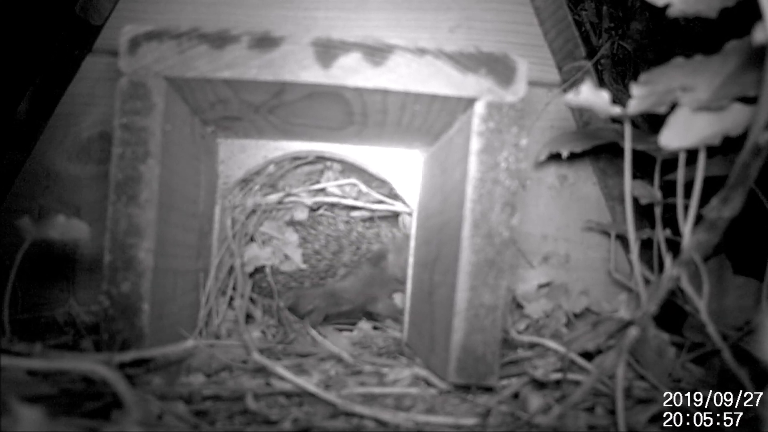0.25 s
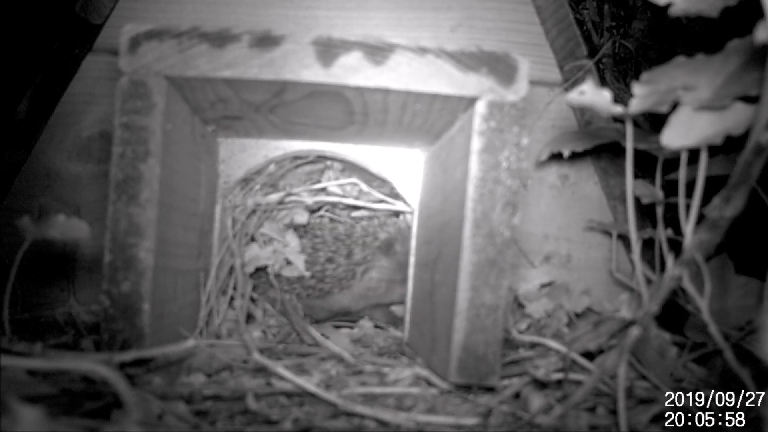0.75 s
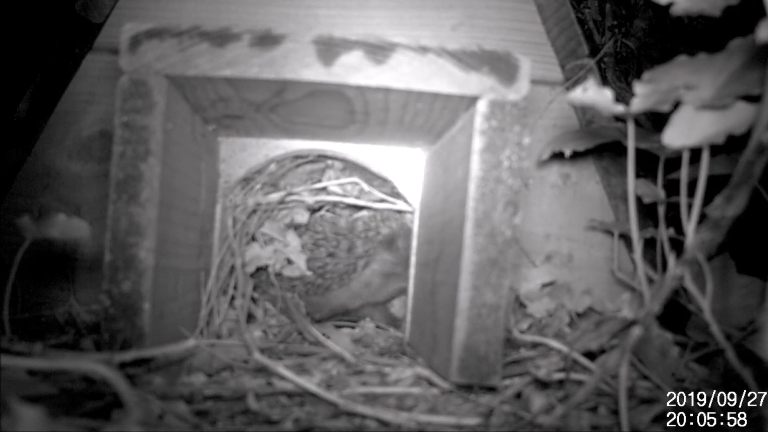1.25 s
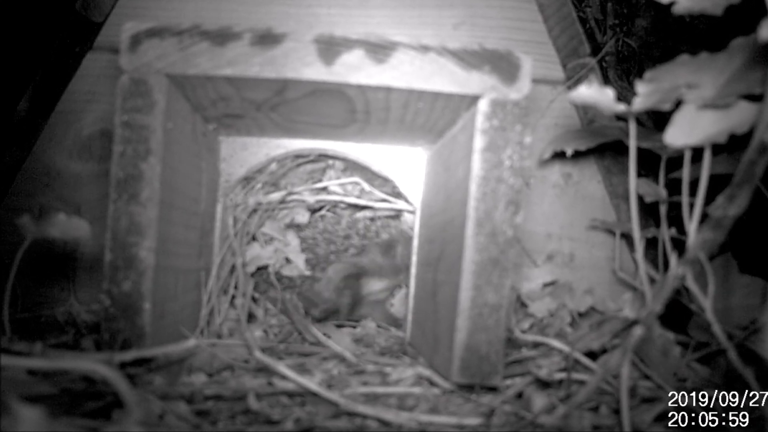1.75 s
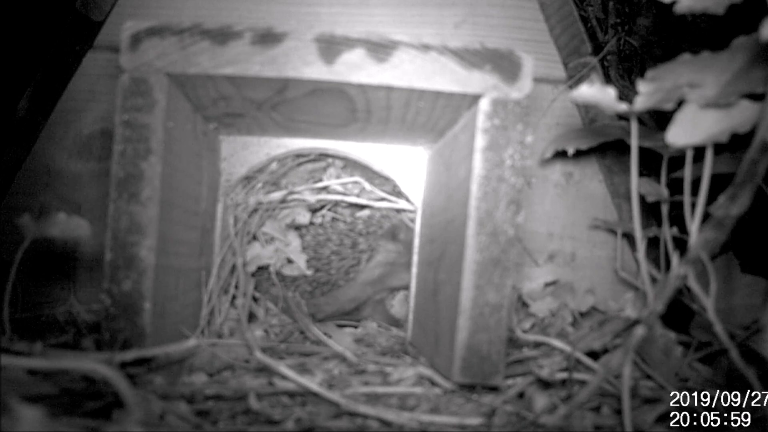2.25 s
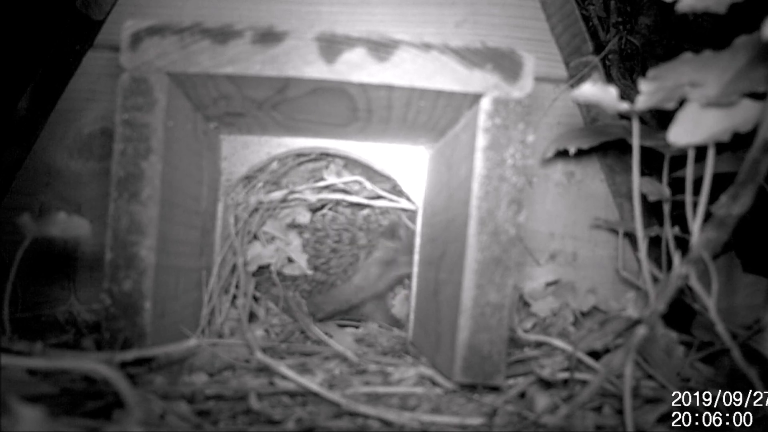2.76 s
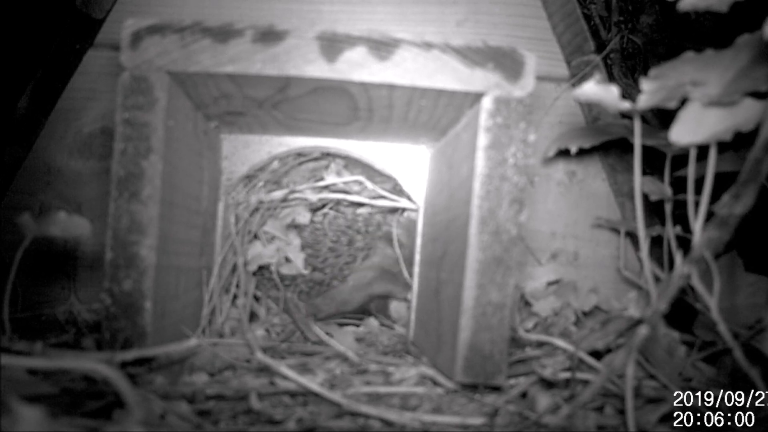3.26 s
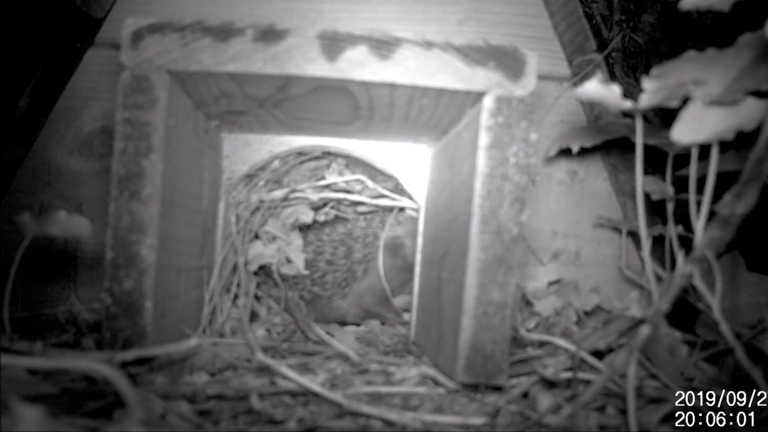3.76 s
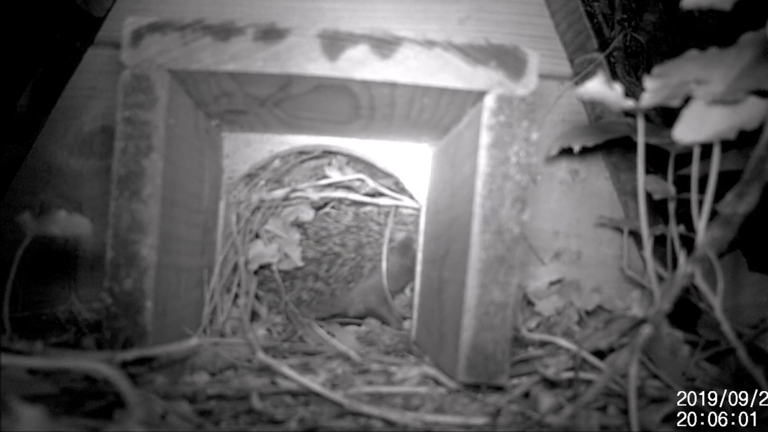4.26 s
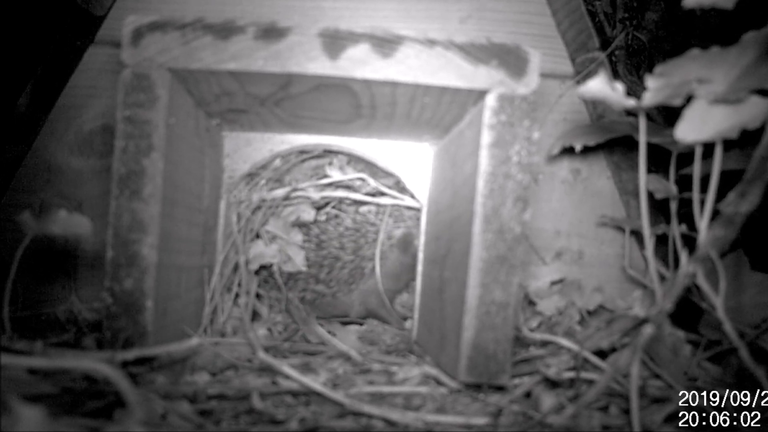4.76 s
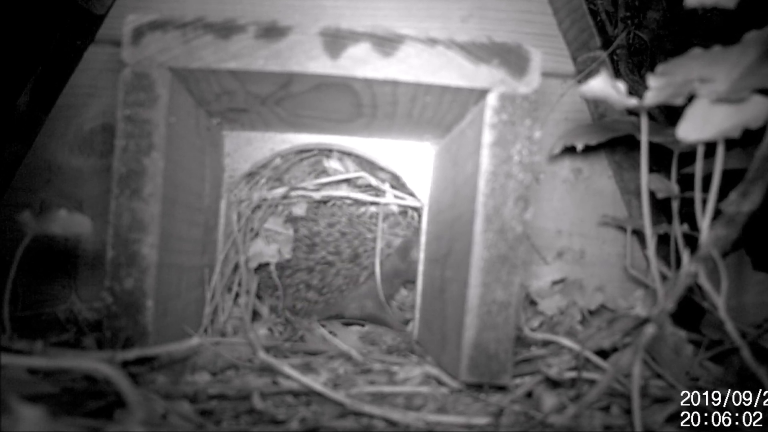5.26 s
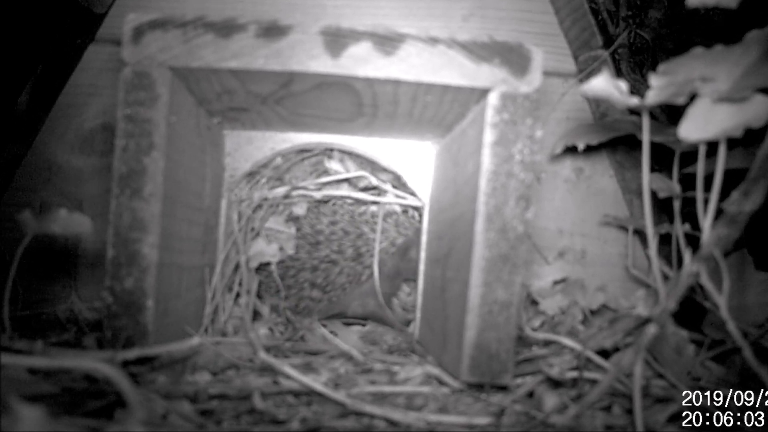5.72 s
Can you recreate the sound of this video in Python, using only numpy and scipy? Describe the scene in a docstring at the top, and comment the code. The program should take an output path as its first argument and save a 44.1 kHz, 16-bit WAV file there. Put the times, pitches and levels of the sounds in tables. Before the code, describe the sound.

Outdoors at dusk, a small camera microphone gives constant soft hiss with faint hum and low flutter. A near songbird rattles out quick, bright chips, then a thin whistle and two buzzing, falling trills. In its pause a much fainter, echo-blurred bird sings fluty notes and twitters. Very distant gull cries are barely audible early on. Near the end the close bird returns with a few sharp rising chirps.

```python
"""A steady hiss comes first, with a thin whistle and a faint gull cry; then a songbird chirps close by.
This is a garden at dusk, heard by a small camera at a hedgehog's nest box. The near bird's whistles, chips, buzzes
and upslurs come from one whistling membrane and a tuned throat, echoed by fences and trees. A farther bird, made of
gliding tones and much echo, fills its pause. Gulls are falling tones; the camera adds hiss, hum and a low flutter."""
import sys
import numpy as np
from scipy import signal
from scipy.fft import rfft, irfft, next_fast_len
from scipy.io import wavfile
from scipy.ndimage import map_coordinates

SR = 44100
rng = np.random.default_rng(int(sys.argv[2]) if len(sys.argv) > 2 else 0)


def wrap_up_sound(samples):
    """Save the sound to the file named by the first command line argument, as 16-bit audio."""
    columns = np.atleast_2d(samples).T
    # keep every value between -1 and 1, then stretch to whole-number steps
    tamed = np.clip(columns, -1, 1)
    steps = np.round(tamed * 32767).astype(np.int16)
    wavfile.write(sys.argv[1], SR, steps)


N = 264159
TIME = np.arange(N) / SR  # seconds


def near_bird():
    """One songbird's phrases, made of four kinds of note."""
    kinds = (whistle, WHISTLES), (chip, CHIPS), (buzz, BUZZES), (upslur, UPSLURS)
    return sum(note(*row) for note, rows in kinds for row in rows)


# In the near bird's tables, level_db is the strength before the throat, the echoes and the preamplifier,
# and swell_db is the change in strength from start to end of the note.
# The near bird's short chips; quaver_hz is the size of the pitch steps:
# start_s, length_s, first_pitch_hz, last_pitch_hz, level_db, swell_db, quaver_hz
CHIPS = [(0.442, 0.0027, 4620, 4850, -30, -5, 0), (0.456, 0.0077, 4150, 4430, -35.5, 2, -5),
         (0.474, 0.0094, 3795, 3460, -26.5, -1, 120), (0.495, 0.016, 4380, 4150, -36, -7.5, -7),
         (0.513, 0.0036, 3350, 3040, -42, -3, 1), (0.542, 0.0086, 3570, 3260, -25.5, -11.5, 2),
         (0.606, 0.0082, 4470, 4680, -30, -4, -4), (.625, 0.026, 3775, 2900, -24.5, -5.5, 130),
         (0.707, 0.0088, 3250, 2700, -44, 6, -3), (.751, .014, 3400, 2990, -40, 3.5, 0),
         (.810, 0.01, 3597, 3636, -24, 0, 0.5), (0.832, .036, 3095, 2707, -30, -13, 88),
         (5.939, 0.0013, 3930, 3780, -30.5, -7, 5)]
QUAVER_RATE_HZ, ARCH_HZ = 110, 70  # how often the pitch steps; how far it bows upward mid-chip


def chip(start, length, first_hz, last_hz, db, swell_db, quaver_hz):
    """A short note, often falling, whose pitch may move in steps and ends in a steep drop."""
    t, u = clock(length)
    quaver = quaver_hz * np.cos(2 * np.pi * QUAVER_RATE_HZ * u * length)
    held = glide(u, first_hz, last_hz, -ARCH_HZ) + quaver
    gain = undb(db + swell_db * u)
    return sing(start, length, t, held, gain, attack_s=0.0033, release_s=0.013, scoop=28, drop=79,
                jitter=.014, shimmer_db=1.0, octave_db=-18)


# The near bird's trills; sag_hz is how far the pitch hangs below a straight glide, swing_hz the trill's reach:
# start_s, length_s, first_pitch_hz, last_pitch_hz, sag_hz, level_db, swell_db, trill_rate_hz, swing_hz, calming_s
BUZZES = [(.128, 0.23, 7990, 8020, -1.5, -61.5, -7.5, 182, 250, 2),
          (1.508, 0.13, 4782, 4350, 313, -23.5, -3.5, 168, 250, 0.26),
          (1.718, .299, 4695, 3746, 250.5, -23.5, -15, 181.9, 250, 0.16)]
TRILL_BUILD_S, TRILL_CHOKE, CHOKE_LAG_RAD = .02, 0.85, .12
TRILL_SCATTER, BUZZ_JITTER = .05, .0065  # unsteadiness of trill rate and of pitch (shares)


def buzz(start, length, first_hz, last_hz, sag_hz, db, swell_db, trill_hz, swing_hz, calm_s,
         hurry=.75, shy=0.36):
    """A note whose glide is hurried early, with a trill that swings its pitch and chokes it, builds up, then calms."""
    t, u = clock(length)
    depth = np.exp(-(u * length / calm_s) ** 2)
    built = 1 - np.exp(-u * length / TRILL_BUILD_S)
    trill = turn(trill_hz * (1 + TRILL_SCATTER * waver(t, 90)))
    swing = swing_hz * depth * (1 - shy * (1 - built)) * np.cos(trill)
    held = glide(u ** hurry, first_hz, last_hz, sag_hz) + swing
    # the sound is weakest near the bottom of each pitch swing
    choke = np.clip(TRILL_CHOKE * depth * built, 0, 1)
    closing = ((1 - np.cos(trill + CHOKE_LAG_RAD)) / 2) ** 2
    gain = undb(db + swell_db * u - BLOOM_DB * bloom(t)) * (1 - choke * closing)
    return sing(start, length, t, held, gain, attack_s=0.0054, release_s=0.0046, scoop=3, drop=12,
                jitter=BUZZ_JITTER, shimmer_db=0.87, octave_db=-21)


# The near bird's climbing notes; climb_s is the middle of the climb, counted from the note's start:
# start_s, length_s, shelf_pitch_hz, top_pitch_hz, climb_s, level_db, swell_db, lead_in_s, octave_before_throat_db
UPSLURS = [(5.607, .029, 3537, 4070, .020, -34.5, -1, 0.024, -5.5),
           (5.695, 0.016, 3900, 6000, 0.0047, -29.5, -2, 0.041, -9.5),
           (5.777, .031, 3654, 4876, 0.027, -23.5, -5.5, 0.015, -12),
           (5.884, 0.048, 3550, 4020, .019, -36, 7.5, 0.0062, -7.5)]
CLIMB_S = .0065  # time scale of the climb off the shelf


def upslur(start, length, shelf_hz, top_hz, climb_at, db, swell_db, lead_s, octave_db):
    """A note that scoops onto a shelf, climbs and snaps down; in a long scoop its octave sweeps the throat first."""
    t, u = clock(length)
    climbed = (1 + np.tanh((u * length - climb_at) / CLIMB_S)) / 2
    held = glide(climbed, shelf_hz, top_hz)
    return sing(start, length, t, held, undb(db + swell_db * u), attack_s=lead_s, release_s=0.023,
                scoop=43, drop=82, jitter=0.0065, shimmer_db=1.5, octave_db=octave_db, reject_db=29)


# The near bird's thin whistles; sag_hz is how far the pitch hangs below a straight glide:
# start_s, length_s, first_pitch_hz, last_pitch_hz, sag_hz, level_db, swell_db, octave_before_throat_db
WHISTLES = [(0.011, 0.11, 8680, 8070, -5, -68, 13.5, -27), (0.883, 0.21, 2248, 2284, 52, -54, -3, 11.5),
            (1.207, 0.23, 7914, 6510, 219.5, -41, 4, -36.5), (5.44, 0.035, 3570, 3690, 70, -50, -6, -31)]


def whistle(start, length, first_hz, last_hz, sag_hz, db, swell_db, octave_db, flat_start=.035):
    """A thin, mostly long tone that starts a little flat and soft, then opens out."""
    t, u = clock(length)
    held = glide(u, first_hz, last_hz, sag_hz) * (1 - flat_start * bloom(t))
    gain = undb(db + swell_db * u - BLOOM_DB * bloom(t))
    return sing(start, length, t, held, gain, attack_s=0.0029, release_s=0.01, scoop=18, drop=92,
                jitter=0.0036, shimmer_db=2.0, octave_db=octave_db)


SLACKEN_S = .003  # the membrane eases into the drop that ends a note


def sing(start, length, t, held, gain, attack_s, release_s, scoop, drop, jitter, shimmer_db, octave_db,
         reject_db=26, rasp=.5):
    """A whistling membrane scoops up to the held pitch and drops off it (octaves per s), rasping while slack."""
    before, after = np.maximum(-t, 0), np.maximum(t - length, 0)
    slack = scoop * before + drop * (np.hypot(after, SLACKEN_S) - SLACKEN_S)  # octaves below held pitch
    hz = held * 2 ** -slack * (1 + jitter * waver(t, 350))
    gate = np.cos(np.pi / 2 * np.minimum(before / attack_s + after / release_s, 1))
    shimmer = undb(shimmer_db * waver(t, 120))
    unrest = shimmer * (1 + rasp * np.tanh(10 * slack) * waver(t, 900))
    phase = turn(hz)
    tone = throat(hz, held, reject_db) * np.sin(phase)
    octave = undb(octave_db) * throat(2 * hz, held, reject_db) * np.sin(2 * phase)
    voice = (tone + octave) * gate * gain * unrest
    at = round((start + t[0]) * SR) + np.arange(len(t))
    inside = (at >= 0) & (at < N)
    note = np.zeros(N)
    note[at[inside]] = voice[inside]
    return note


THROAT_DB_PER_OCTAVE = 71  # fall-off outside a note's own range


def throat(hz, held, reject_db):
    """A throat tuned to a note's held pitches damps what lies above or below, up to a limit."""
    outside = abs(np.log2(hz / np.clip(hz, held.min(), held.max())))
    return undb(-np.minimum(THROAT_DB_PER_OCTAVE * outside, reject_db))


BLOOM_DB, BLOOM_S = 7, .012  # whistles and buzzes start this much softer and open out


def bloom(t):
    """How far a note still is from full voice: 1 at its start, soon near 0."""
    return np.exp(-np.maximum(t, 0) / BLOOM_S)


# Single reflections from the box front, ground and fences: delay_s, level_db
NEAR_ECHOES = [(.0023, -27.5), (.0058, -18), (.0135, -22), (.028, -22), (.052, -22.5)]


def garden(x, early_db=-19, early_t60=0.11, early_build_s=.012, late_db=-19, late_t60=0.86):
    """Direct sound, a few hard reflections, scatter from nearby shrubs and a long faint ring of trees and houses."""
    response = undb(early_db) * tail(early_t60, early_build_s) + undb(late_db) * tail(late_t60, 0.016)
    response[0] += 1
    for delay, db in NEAR_ECHOES:
        response[int(delay * SR)] += undb(db)
    return echoed(x, response)


# The far bird's notes, with level before the swell and echo mix; warble_hz is the reach of the pitch wobble:
# start_s, length_s, first_pitch_hz, last_pitch_hz, level_db, warble_hz
FAR_SONG = [(2.45, 0.062, 1550, 2040, -71, 13), (2.508, 0.069, 1907, 1976, -62, 29),
            (2.551, 0.065, 2340, 2030, -69, 37), (2.702, 0.032, 2570, 2820, -70.5, 63),
            (2.715, 0.064, 2110, 2030, -67, 73), (2.849, 0.094, 1956, 2110, -61.5, 203),
            (2.925, 0.11, 2092, 2147, -57, 270), (3.139, 0.077, 1796, 1685, -68.5, 70),
            (3.355, 0.093, 3375, 3444, -62, 28), (3.39, 0.055, 4730, 4164, -74, 106),
            (3.41, 0.056, 3325, 2797, -60, 190), (3.423, 0.013, 2217, 2160, -48.5, 105),
            (3.507, 0.045, 2610, 3156, -59.5, 150), (3.822, 0.046, 1723, 1657, -68.5, 43),
            (3.971, .12, 2350, 2727, -68.5, 21), (4.094, 0.04, 2025, 2170, -55, 95),
            (4.153, 0.119, 2180, 2281, -63.5, 22), (4.135, 0.04, 2735, 3550, -66, 120),
            (4.431, 0.026, 6440, 5230, -64.5, 570), (4.428, 0.03, 2600, 3080, -58.5, 290),
            (4.467, 0.052, 4560, 3460, -62.5, 450), (4.532, 0.13, 2990, 3937, -66.5, 560),
            (4.601, 0.1, 4063, 4140, -63, 270), (4.721, 0.089, 3090, 3620, -69.5, 410),
            (4.773, 0.099, 4500, 3930, -67.5, 350)]


def far_bird(direct_db=-8, early_db=-2, wet_db=0, t60=1.84, swell_db=2, octave_db=-24):
    """Fluty notes with a faint octave and a closing twitter, wavering in strength and arriving mostly as echo."""
    song = sum(slide(*note, octave_db=octave_db) for note in FAR_SONG)
    song = song * undb(swell_db * walk(24.963))
    response = undb(early_db) * tail(0.46, 0.0041) + undb(wet_db) * tail(t60, 0.032)
    return undb(direct_db) * song + echoed(song, response)


# Gull cries, each falling, with level before the echo mix:
# start_s, length_s, first_pitch_hz, last_pitch_hz, level_db
GULLS = [(0.117, 0.22, 1110, 915, -76.5), (.19, 0.09, 1270, 1087, -80), (0.501, 0.14, 1260, 1030, -81.5),
         (0.877, 0.13, 1260, 1040, -79), (2.052, 0.094, 1310, 1150, -83), (2.391, .12, 1170, 992, -84),
         (2.65, 0.091, 1050, 960, -82), (2.971, 0.12, 1100, 910, -81.5)]


def gulls(direct_db=-2, wet_db=-4):
    """Falling cries from very far off, each a gliding tone with a faint octave, blurred by echo."""
    cries = sum(slide(*cry) for cry in GULLS)
    return undb(direct_db) * cries + undb(wet_db) * echoed(cries, tail(0.48, 0.049))


# Tone colour of the hiss, before its overall level is set: pitch_hz, relative_level_db
HISS = [(60, 0), (200, -2), (500, -5.5), (1050, -6), (1500, -9), (3500, -11), (7000, -17), (10000, -19.5),
        (15500, -21.5)]
# Steady hum tones: pitch_hz, peak_level_db
HUM = [(125, -99), (150, -98.5), (250, -88)]
# Tones of the low electrical flutter: pitch_hz, peak_level_db
FLUTTER = [(10.4, -78), (11.4, -77), (20.8, -66), (30, -77), (32.2, -78), (41.6, -79), (50.5, -86),
           (62.4, -91)]


def camera_noise(hiss_db=-72.5, flutter_wander=0.07, rumble_db=-81):
    """Steady amplifier hiss, hum, low rumble, and an electrical throb whose tones share one small phase wander."""
    size = next_fast_len(N, real=True)
    f = np.maximum(np.arange(size // 2 + 1) * SR / size, 1)
    hz, db = np.transpose(HISS)
    colour = undb(np.interp(np.log(f), np.log(hz), db))
    hiss = irfft(rfft(rng.standard_normal(size)) * colour, size)[:N]
    wander = flutter_wander * walk(6)  # radians
    hum = sum(undb(db) * np.sin(2 * np.pi * (hz * TIME + rng.random())) for hz, db in HUM)
    flutter = sum(undb(db) * np.cos(2 * np.pi * hz * TIME + wander) for hz, db in FLUTTER)
    low_band = signal.butter(2, [12, 36], "band", fs=SR, output="sos")
    rumble = signal.sosfilt(low_band, rng.standard_normal(N))
    hiss = undb(hiss_db) * hiss / hiss.std()
    return hiss + hum - flutter + undb(rumble_db) * rumble / rumble.std()


def slide(start, length, first_hz, last_hz, db, warble_hz=0, warble_rate=65, octave_db=-30):
    """One gliding, warbling note with soft ends; chance varies its warble rate."""
    end = start + length
    span = np.flatnonzero((TIME >= start) & (TIME <= end))
    t = TIME[span]
    hz = np.interp(t, [start, end], [first_hz, last_hz])
    hz = hz + warble_hz * np.sin(2 * np.pi * (warble_rate * rng.uniform(0.87, 1.3) * t + rng.random()))
    phase = turn(hz)
    tone = np.sin(phase) + undb(octave_db) * np.sin(2 * phase)
    note = np.zeros(N)
    note[span] = undb(db) * fade(len(span), 0.0068) * tone
    return note


def tail(t60, build_s):
    """Scatter from leaves and walls: a dense echo of unit energy that builds up, then dies away, treble first."""
    t = TIME[:SR + SR // 2]
    noise = rng.standard_normal(len(t))
    low = signal.sosfiltfilt(signal.butter(2, 4500, fs=SR, output="sos"), noise)
    decay = np.exp(-np.log(1000) * t / t60)  # the lows fall 60 dB in t60 seconds
    echo = (1 - np.exp(-t / build_s)) * (low * decay + (noise - low) * decay ** 2.0)
    return echo / np.sqrt(np.sum(echo ** 2))


def echoed(x, response):
    """A sound as it arrives through an echo pattern."""
    return signal.fftconvolve(x, response)[:N]


def clock(length, margin_s=.045):
    """Time since a note's start, with a margin on both sides, and the share of the note that has passed."""
    t = np.arange(-margin_s * SR, (length + margin_s) * SR) / SR
    return t, np.clip(t / length, 0, 1)


def glide(u, first_hz, last_hz, sag_hz=0):
    """Pitch that runs from first to last, hanging below the straight line (above it if sag is negative)."""
    return first_hz + (last_hz - first_hz) * u - sag_hz * 4 * u * (1 - u)


def turn(hz):
    """Phase of an oscillator that follows a pitch curve."""
    return 2 * np.pi * np.cumsum(hz) / SR


def waver(t, rate):
    """Smooth chance over one note, spread near 1, changing about rate times a second."""
    return map_coordinates(rng.standard_normal(1024), [(t - t[0]) * rate], order=2, mode="wrap")


def walk(rate):
    """Smooth chance over the whole scene, spread near 1, changing about rate times a second."""
    knots = rng.standard_normal(16384)
    return map_coordinates(knots, [TIME * rate], order=2, mode="wrap")


def fade(count, edge_s):
    """A gate with soft ends."""
    return signal.windows.tukey(count, min(1, 2 * edge_s * SR / max(count, 1)))


def undb(db):
    """Decibels to gain."""
    return 10 ** (np.asarray(db) / 20)


def scene():
    """Near bird, far bird, gulls and camera noise; one microphone feeds both channels."""
    sound = garden(near_bird()) + far_bird() + gulls() + camera_noise()
    return np.array([sound, sound])


TOP_HZ = 15700  # the sound is cut above this


def record(dry, ceiling_db=-20.5):
    """The small preamplifier rounds the loudest chirps, which adds a third harmonic; the top is cut."""
    ceiling = undb(ceiling_db)
    rounded = ceiling * np.tanh(dry / ceiling)
    top_cut = signal.ellip(10, .2, 70, TOP_HZ, fs=SR, output="sos")
    return signal.sosfilt(top_cut, rounded)


dry = scene()
out = record(dry)
wrap_up_sound(out)
```